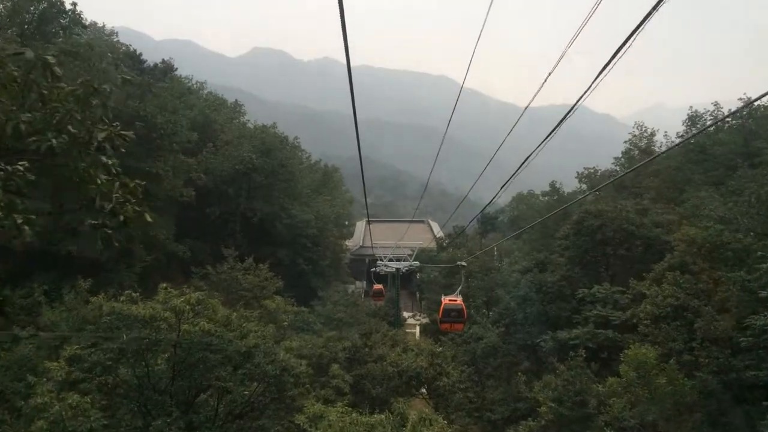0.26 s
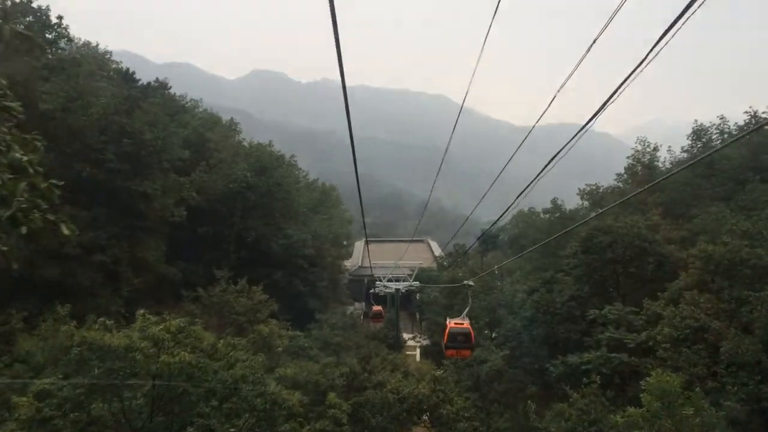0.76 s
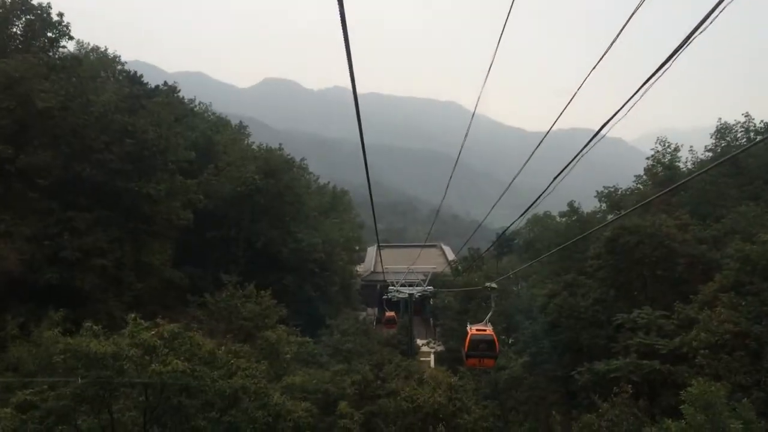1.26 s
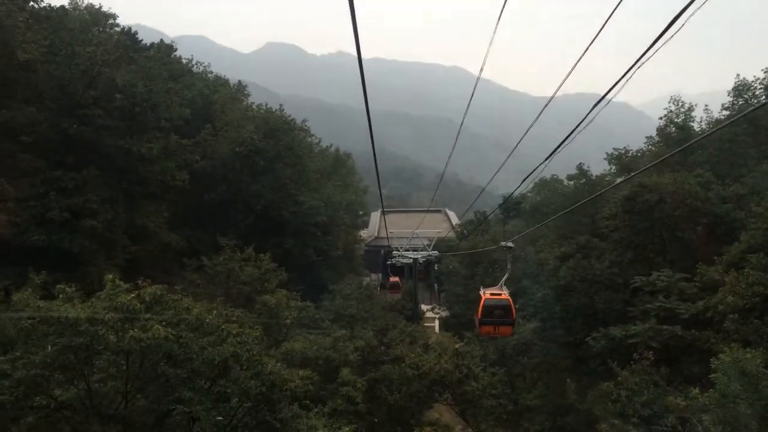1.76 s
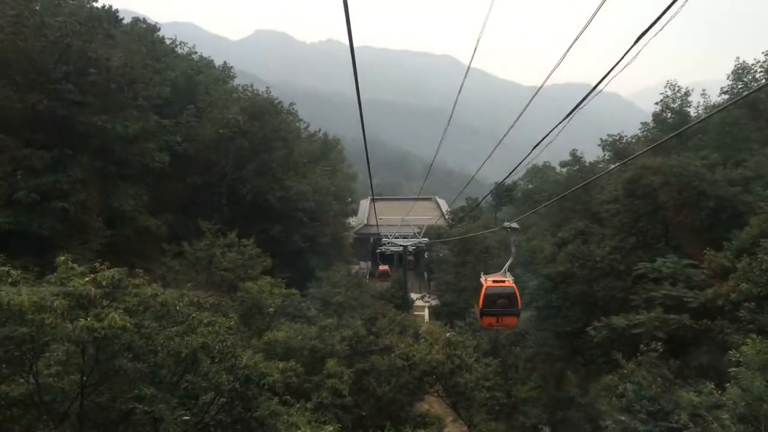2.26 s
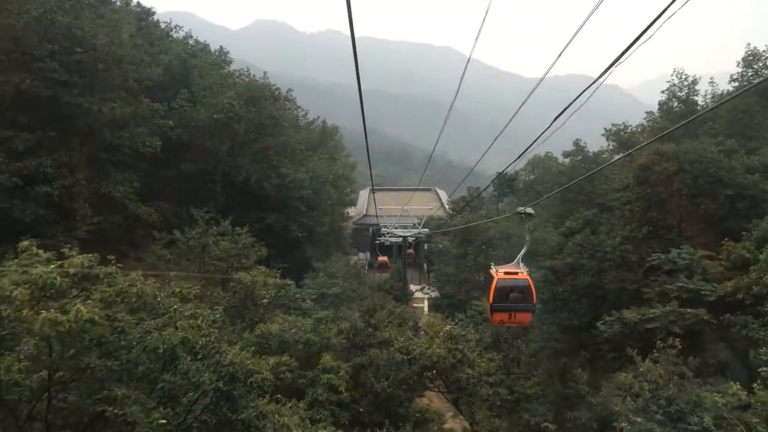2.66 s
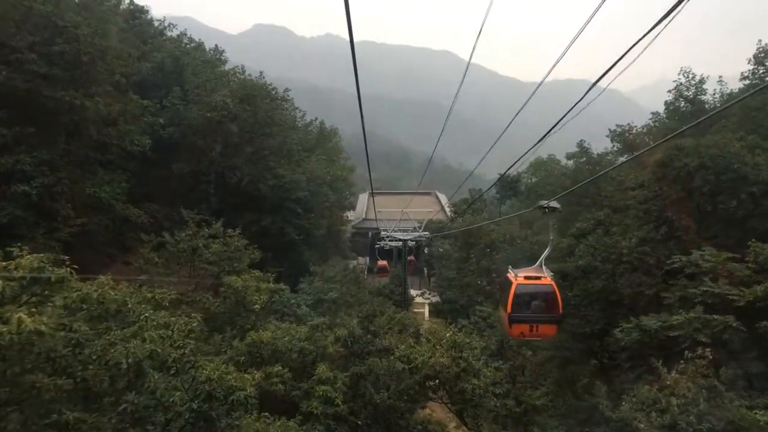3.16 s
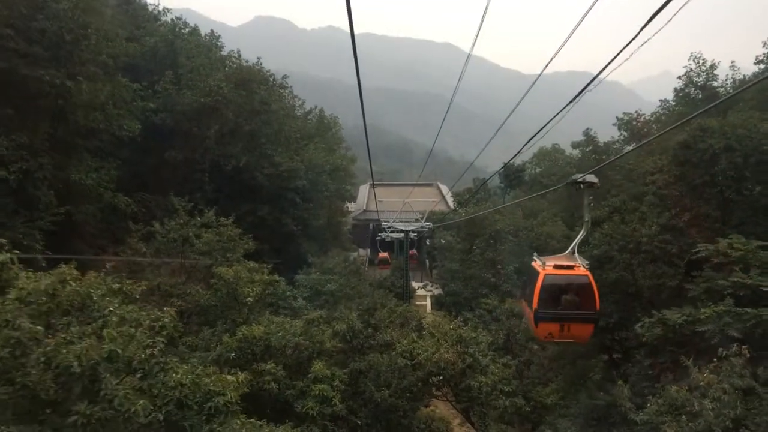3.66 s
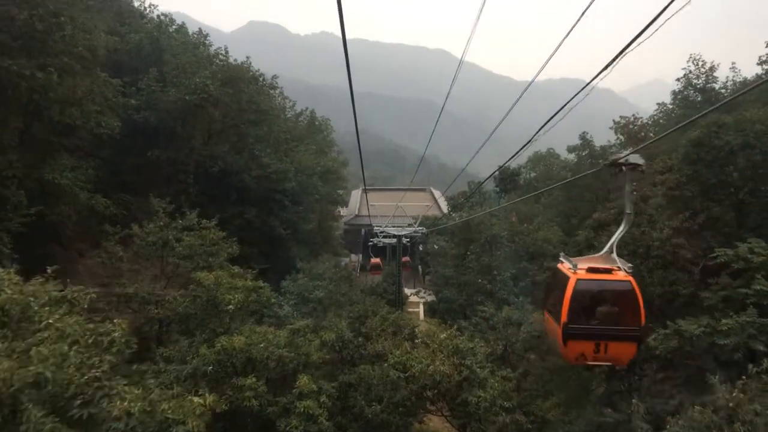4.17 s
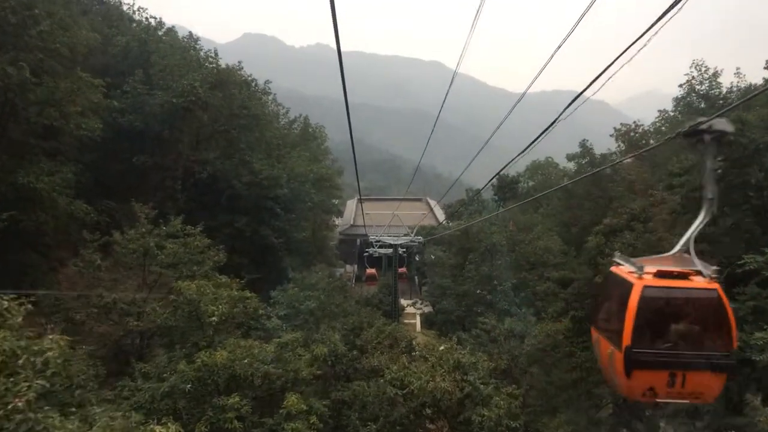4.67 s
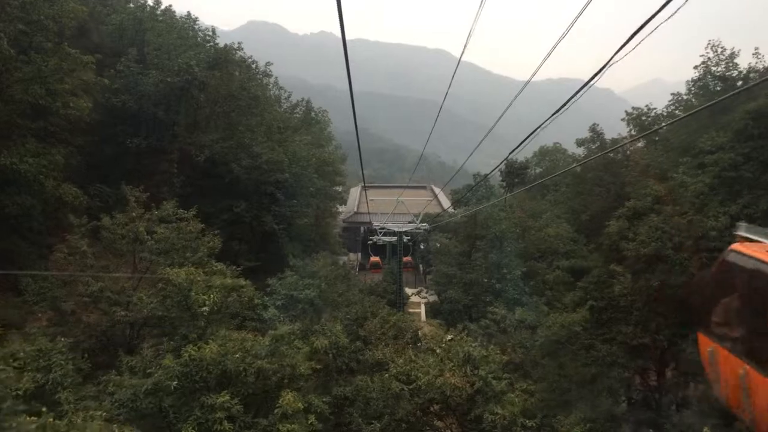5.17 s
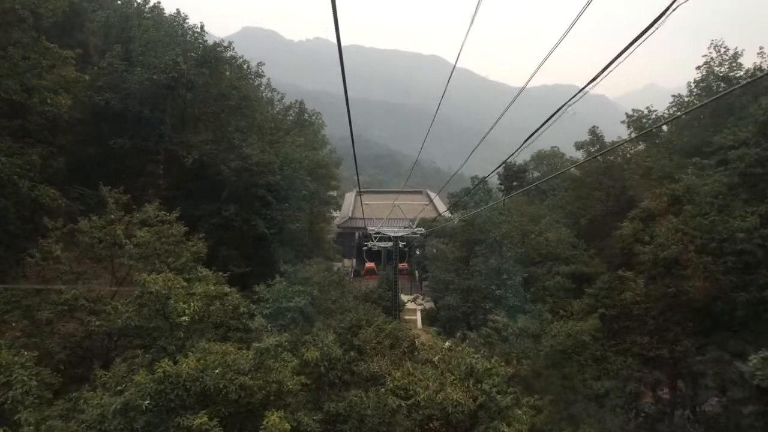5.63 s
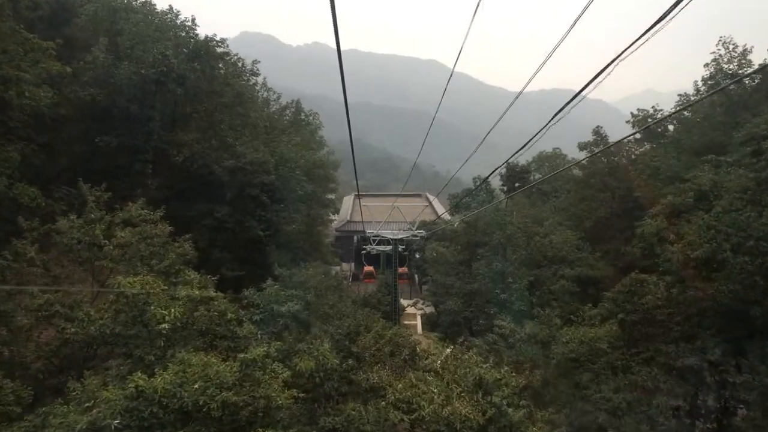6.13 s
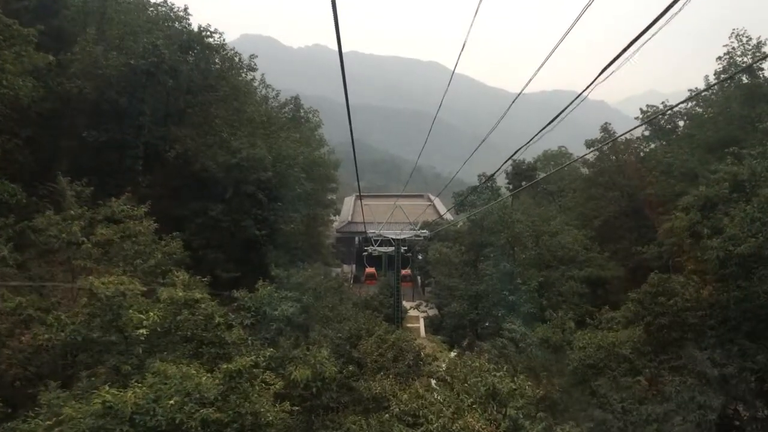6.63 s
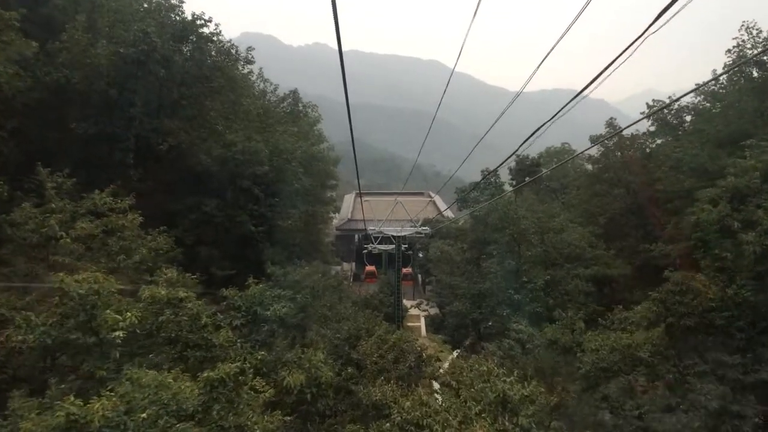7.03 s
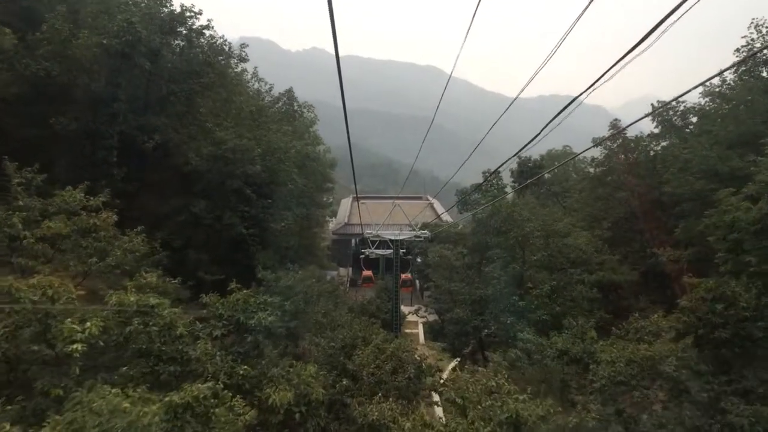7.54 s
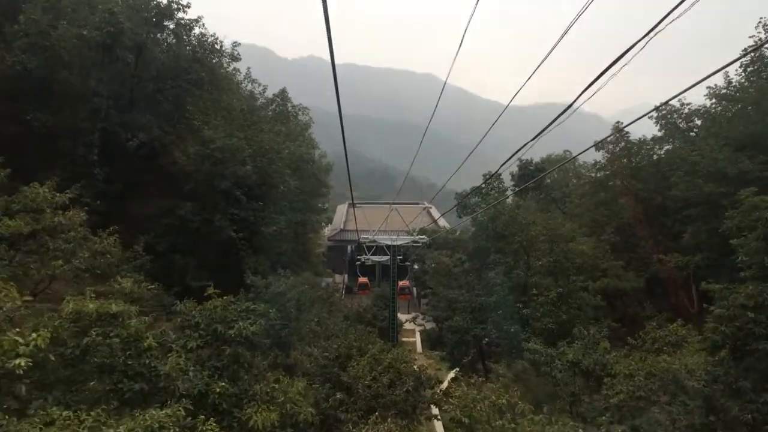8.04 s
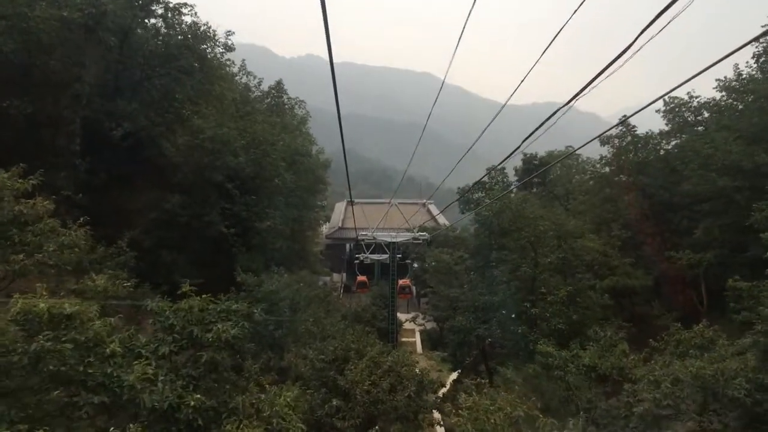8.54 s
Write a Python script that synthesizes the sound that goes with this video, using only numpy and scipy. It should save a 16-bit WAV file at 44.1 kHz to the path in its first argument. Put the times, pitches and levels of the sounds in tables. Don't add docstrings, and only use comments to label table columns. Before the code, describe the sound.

Inside a small gondola cabin, a deep hum and faint airy wash run throughout. Within the first second the grip bumps over tower wheels: heavy jolts, booming panels, dense rattling and a short gritty grind. Afterwards a loose hanger part knocks irregularly on the same metal frame, firm at first, then softer and duller, with faint rubbing. Close, slightly hissy microphone in the cabin.

```python
import sys
import numpy as np
from scipy import signal
from scipy.fft import rfft, irfft, next_fast_len
from scipy.io import wavfile
from scipy.ndimage import uniform_filter1d

SR = 44100
rng = np.random.default_rng(int(sys.argv[2]) if len(sys.argv) > 2 else 0)


def boost_factor(decibels):
    exponent = np.asarray(decibels, float) / 20
    return 10 ** exponent


def put_to_file(sound):
    columns = np.atleast_2d(sound).T
    safe = np.clip(columns, -1, 1)
    whole_steps = np.round(safe * 32767)
    wavfile.write(sys.argv[1], SR, whole_steps.astype(np.int16))


N = 388080

# pitch in Hz, level in dB, time to fall by 60 dB in seconds, time of the top in ms.
FRAME_MODES = [(337.4, -43.5, 0.98, 6.4), (455, -30, 0.15, 4.9), (522, -39, 0.41, 1.6),
               (619.4, -43.5, 0.088, 31), (754.8, -35, 0.47, 1.4), (846.3, -35.5, 0.38, 17),
               (988, -59, 0.27, 66), (1171, -45, 0.24, 21), (1389, -41.5, 0.33, 8.7),
               (1518, -33.5, 0.15, 8.9), (1607, -37.5, 0.18, 63), (1654, -38.5, 0.04, 20.5),
               (1797, -39.5, 0.06, 34.5), (1836, -39, 0.53, 13.4), (1926, -39, 0.068, 27),
               (1970, -60, 0.06, 2.6), (1985, -54, 0.39, 16), (2420, -37.5, 0.28, 1.3),
               (2313, -43, 0.033, 9.8), (2444, -48.5, 0.2, 68), (2490, -69, 0.3, 250),
               (2490, -43, 0.16, 23), (2916, -37, 0.032, 1.9), (2550, -79, 0.25, 6.6),
               (2764, -48.5, 0.24, 23.6), (3240, -68, 0.15, 6.9), (3270, -57, 0.27, 3.6),
               (3271, -73, 0.2, 61), (3480, -58.5, 0.24, 25), (4100, -61, 0.047, 12)]
# frequency in Hz, level in dB per Hz.
SMALL_MODE_COLOUR = [(250, -8), (480, -6), (850, 3), (1050, -9), (1600, 0.5), (2900, -8.5), (3150, -17.5),
                     (4500, -24.5), (7000, -53)]


def evened(x):
    return x / np.sqrt(np.mean(x ** 2) + 1e-20)


def curve(rows, column):
    rows = np.array(rows)
    return np.interp(np.arange(N) / SR, rows[:, 0], rows[:, column])


def coloured(x, points):
    hz, db = np.transpose(points)
    size = next_fast_len(len(x) + 4096)
    f = np.fft.rfftfreq(size, 1 / SR)
    gain = boost_factor(np.interp(np.log(f + 1), np.log(hz + 1), db, left=-90))
    return irfft(rfft(x, size) * gain, size)[:len(x)]


def resonate(x, hz, width):
    r = np.exp(-np.pi * width / SR)
    return 2 * signal.lfilter([1 - r], [1, -r * np.exp(2j * np.pi * hz / SR)], x).real


def add(mix, s, sound):
    part = mix[max(round(s * SR), 0):][:len(sound)]
    part += sound[:len(part)]


def hum(modes, column, steady_s=0.12):
    # time in seconds, pull of the cable strands in dB, shaking of the hanger in dB.
    ride = [(0.0, -41, -37), (0.19, -21.5, -24), (0.37, -43, -38.5), (0.56, -23, -28), (1.25, -37.5, -25),
            (1.42, -34.5, -38.5), (1.94, -29.5, -37.5), (2.13, -59, -26.5), (2.3, -28.5, -36.5),
            (3.87, -37.5, -41), (6.77, -33.5, -37.5), (7.01, -37, -44), (7.67, -32.5, -39),
            (8.65, -37.5, -38.5), (8.8, -34, -33.5)]
    shake = rng.standard_normal(N)
    x = evened(sum(boost_factor(db) * evened(resonate(resonate(shake, hz, w), hz, 2 * w)) for hz, w, db in modes))
    size = round(steady_s * SR)
    slow = uniform_filter1d(uniform_filter1d(x ** 2, size), size)
    return boost_factor(curve(ride, column) - 2.0) * x / np.sqrt(abs(slow) + 0.031)


def blows():
    # time in seconds, blow in dB, treble tick in dB.
    firm_knocks = [(0.1873, -2, -62), (0.3872, -7, -55.5), (0.4406, -7.5, -58), (1.5668, -13.5, -61),
                   (1.8144, -5, -63.5), (1.9323, -11, -58.5), (2.0024, -3, -62), (2.1016, 2, -49.5),
                   (2.1671, 1, -57), (2.376, -14.5, -60.5), (2.6259, -12, -59), (2.6877, -5, -63.5),
                   (2.884, -12, -59), (3.089, -7, -67), (3.3714, -18, -62.5), (3.4348, -8, -56.5),
                   (3.5892, -11.5, -60.5), (3.68, -8.5, -59), (4.15, -19, -61.5), (4.2286, -9, -59.5),
                   (4.3219, -12, -60), (4.52, -5, -55), (4.7336, -13, -61.5), (4.872, -4.5, -57.5),
                   (4.9428, -4, -52), (4.9991, -4, -62), (5.486, -16, -62.5), (5.9006, -18, -61.5),
                   (6.031, -10, -57), (6.1301, -10, -61)]
    # time in seconds, blow in dB, treble tick in dB.
    shaken_blows = [(0.5164, -32, -72), (0.576, 6.5, -33), (0.621, 5.5, -58.5), (0.663, -5, -87.5),
                    (0.685, 1, -40.5), (0.743, 7.5, -53.5), (0.7655, 5, -50.5), (0.782, -1, -56),
                    (0.797, 5.5, -57), (0.813, -20, -62.5), (0.8812, 1.5, -38), (0.9489, 6.5, -56),
                    (0.979, 4.5, -54.5), (0.9996, -3.5, -43.5), (1.012, 0, -63), (1.079, -5, -63.5),
                    (1.123, 4.5, -61), (1.1511, 11, -52), (1.196, -10, -74), (0.663, -4, -71),
                    (0.904, 2.5, -56), (1.024, -5, -66), (1.17, 3.5, -62), (1.199, -20, -86)]
    # time in seconds, blow in dB.
    light_taps = [(0.0955, -22), (0.2667, -15), (1.3115, -14), (1.3946, -15.5), (2.7126, -34),
                  (3.1522, -16), (3.2634, -15), (4.2864, -19), (4.8108, -28), (5.1601, -16.5),
                  (5.3738, -10.5), (5.7505, -11.5), (5.8422, -15), (6.0838, -9), (6.5922, -23),
                  (6.6718, -16), (7.087, -23.5), (7.3093, -13), (7.42, -11.5), (7.5109, -18.5),
                  (8.3462, -17.5), (8.632, -12.5)]
    # time in seconds, blow in dB.
    padded_bumps = [(1.478, -22.5), (1.8544, -20), (2.0513, -9), (3.0399, -11.5), (3.319, -14),
                    (3.864, -19), (3.9287, -18), (4.1032, -16), (4.5811, -11), (5.0878, -21), (5.2311, -21),
                    (5.406, -16.5), (5.605, -9.5), (5.8028, -23), (5.9463, -16.5), (6.2013, -21),
                    (6.308, -14), (6.5092, -17.5), (6.7427, -19), (6.802, -22), (7.0512, -20.5),
                    (7.1368, -13), (7.6017, -25), (7.701, -13.5), (7.804, -17), (8.069, -18),
                    (8.2444, -15.5), (8.187, -38), (8.358, -7.5), (8.4527, -17)]
    full_hard_tick_db, hard_per_db = -57, 1.2
    firm = [(s, db, tick, hard_per_db * (tick - db - full_hard_tick_db))
            for s, db, tick in firm_knocks + shaken_blows]
    taps = [(s, db, -50.5 + 2.5 * db, -1.5) for s, db in light_taps]
    bumps = [(s, db, -91, -13.5) for s, db in padded_bumps]
    return firm + taps + bumps


def stirring(spread_s):
    power = np.zeros(N)
    for s, db, _, _ in blows():
        add(power, s, boost_factor([db]) ** 2)
    size = round(spread_s * SR)
    return abs(uniform_filter1d(uniform_filter1d(power, size), size)) * SR / 10


def rolling():
    # time in seconds, level in dB.
    roughness = [(0.0, -44), (0.19, -63), (0.54, -42), (0.78, -29.5), (1.03, -47), (1.32, -49.5),
                 (1.62, -49), (2.15, -51.5), (2.28, -47.5), (3.82, -48), (3.97, -52), (4.48, -50.5),
                 (5.39, -51), (5.59, -47.5), (7.03, -52), (7.3, -46), (8.21, -52.5), (8.8, -49)]
    stirred_db, stir_s = -46, 0.09
    return np.sqrt(boost_factor(curve(roughness, 1) - 1.5) ** 2 + boost_factor(stirred_db) ** 2 * stirring(stir_s))


def sway(db=-44, follow=0.91, rest_db=-52.5):
    x = evened(resonate(resonate(rng.standard_normal(N), 57.3, 23), 36, 46))
    return boost_factor(db) * (rolling() / boost_factor(rest_db)) ** follow * x


def rumble(per_s=900, spread_db=-2.0, panel_db=-5, flicker_db=6.0, lump_db=3.0):
    # frequency in Hz, level in dB per Hz.
    panel_colour = [(100, -8.5), (170, -3), (269, -7.5), (333, -6), (456, -4), (579, -12), (835, -16),
                    (925, -22.5), (1300, -32.5), (1690, -48.5), (2860, -96)]
    # pitch in Hz, width in Hz, level in dB.
    panel_modes = [(220, 4.8, 1), (266, 6.9, -2), (335.5, 13.5, 6), (373, 11.4, 3.5), (446, 6.8, 2),
                   (527.7, 11, -3.5), (610.7, 5.5, -13)]
    # frequency in Hz, level in dB per Hz.
    rub_colour = [(600, -8), (900, 5.5), (1700, 2), (2100, 0.5), (2500, -10), (3500, -11), (5000, -38)]
    rub_db, rub_follow, rub_s = -58, 0.78, 0.084

    grain_size = boost_factor(spread_db * np.minimum(rng.exponential(1, N), 3))
    grains = rng.standard_normal(N) * (0.11 + grain_size * (rng.random(N) < per_s / SR))
    panels = evened(coloured(grains, panel_colour))
    ringing = evened(sum(boost_factor(db) * evened(resonate(resonate(grains, hz, w), hz, 3 * w))
                         for hz, w, db in panel_modes))
    x = panels + boost_factor(panel_db) * ringing

    slips = boost_factor(flicker_db * evened(resonate(rng.standard_normal(N), 0, 15)))
    rubbing = evened(coloured(slips * rng.standard_normal(N), rub_colour + [(8000, -67.5)]))
    swinging = (stirring(rub_s) + 0.00062) ** (rub_follow / 2)

    wander = evened(resonate(resonate(rng.standard_normal(N), 0, 6.4), 0, 24))
    lumps = boost_factor(lump_db * wander)
    return rolling() * lumps * x + boost_factor(rub_db) * swinging * rubbing


def air(swell_db=2.5):
    # frequency in Hz, level in dB per Hz.
    vent_colour = [(700, -9), (1100, 4.5), (1600, 0), (2300, -4.5), (2600, -12.5), (3800, -19), (6000, -30)]
    swell = boost_factor(swell_db * evened(resonate(resonate(rng.standard_normal(N), 0, 2.5), 0, 5)))
    return boost_factor(-73) * swell * evened(coloured(rng.standard_normal(N), vent_colour + [(9000, -71)]))


def scuffs():
    # time in seconds, level in dB, length in seconds, centre in Hz.
    puffs = [(0.0, -52.5, 0.0033, 4960), (0.84, -64, 0.047, 8000), (1.236, -67.5, 0.017, 2630),
             (1.245, -63, 0.0055, 8600), (2.332, -70, 0.022, 3370), (2.333, -75, .015, 8060),
             (2.413, -72, 0.0036, 9900), (3.615, -74, 0.068, 7000), (3.67, -72, .005, 10100),
             (3.965, -70.5, 0.019, 2550), (4.133, -67, 0.032, 8850), (4.17, -72, 0.0086, 9000),
             (4.669, -73, 0.024, 4500), (6.61, -74, 0.057, 2570), (7.11, -69.5, 0.047, 2700)]
    out = np.zeros(N)
    for (s, db, length, hz), noise in zip(puffs, rng.standard_normal((len(puffs), SR // 10))):
        puff = evened(resonate(resonate(noise, hz, 0.6 * hz), hz, 0.6 * hz))[:round(length * SR)]
        add(out, s, boost_factor(db) * puff * signal.windows.tukey(len(puff), .6))
    return out


def first_waves(t, hold_s=0.036, drop_db=-9):
    rise_s, step_s = .005, .007
    return np.clip(t / rise_s, 0, 1) * boost_factor(drop_db * np.clip((t - hold_s) / step_s, 0, 1))


def small_modes(noise, db=-39, t60=0.41, treble_t60=0.21, colour=SMALL_MODE_COLOUR):
    t = np.arange(len(noise)) / SR
    crowd = evened(coloured(noise, colour))
    low = signal.sosfiltfilt(signal.butter(2, 2200, fs=SR, output="sos"), crowd)
    low_ring = low * boost_factor(-60 * t / t60) * first_waves(t)
    high_ring = (crowd - low) * boost_factor(-60 * t / treble_t60) * np.clip(t / 0.0049, 0, 1)
    return boost_factor(db) * (low_ring + high_ring)


def frame(spot, damping=0.47, scatter_db=-5, spot_db=2.5, spot_tune=0.0063):
    t = np.arange(SR // 4) / SR
    out = np.zeros(len(t))
    changes = rng.standard_normal((len(FRAME_MODES), 2))
    for (hz, db, t60, top_ms), turn, (lift, tune) in zip(FRAME_MODES, spot, changes):
        top_s = top_ms / 1000
        swell = np.sin(np.pi / 2 * np.clip(t / top_s, 0, 1)) ** 4
        ring = np.sin(2 * np.pi * (hz * (1 + spot_tune * tune) * t + turn))
        fall_db = 60 * np.maximum(t - top_s, 0) / (damping * t60)
        out += boost_factor(db + spot_db * lift - fall_db) * swell * ring
    scatter = boost_factor(scatter_db * np.clip(t / 0.058, 0, 1))
    return out * first_waves(t) * scatter + small_modes(rng.standard_normal(len(t)))


def spots(count=7):
    turns = rng.random(len(FRAME_MODES))
    return [frame(turns) for _ in range(count)]


def clack(t):
    # pitch in Hz, level in dB, arrival in ms, length in ms.
    packets = [(2720, -36, 6, 2.5), (2930, -38, 7, 3), (2400, -42, 10, 4)]
    return sum(boost_factor(db) * np.exp(-((1000 * t - ms) / length) ** 2 / 2) * np.sin(2 * np.pi * hz * t)
               for hz, db, ms, length in packets)


def knocks(bodies, soft_hz=1900, own_db=0.0, clack_db=-1, tick_gain_db=-3, sizzle_db=6, sizzle_t60=0.094,
           snap=0.62):
    # frequency in Hz, level in dB per Hz.
    fittings = [(1760, -18), (3000, 0), (3280, -5.5), (4640, -15.5), (5040, -13), (5970, -21.5),
                (6570, -20), (8900, -28), (9820, -16.5), (10600, -29.5), (11200, -32), (12400, -20),
                (15300, -36)]
    sharp, soft, ticks, sizzle = np.zeros((4, N))
    t = np.arange(len(bodies[0])) / SR
    rows, bright = blows(), clack(t)
    tick_shape = np.sin(np.pi * np.clip(t / .009, 0, 1))
    sizzle_start = np.clip(t / 0.003, 0, 1) * (0.76 + snap * np.exp(-t / 0.017))
    noises = rng.standard_normal((len(rows), len(t)))
    for (s, db, tick_db, hard_db), body, noise in zip(rows, bodies * len(rows), noises):
        hard = boost_factor(min(hard_db, 0))
        sound = boost_factor(db) * (body + boost_factor(own_db) * small_modes(noise))
        bright_db = db + clack_db + .5 * min(tick_db - db + 56.5, 0)
        add(sharp, s, hard * (sound + boost_factor(bright_db) * bright))
        add(soft, s, (1 - hard) * sound)

        shaken = np.clip((tick_db + 67) / 14, 0, 1)
        faint_db = 12 * np.clip((-72 - tick_db) / 6, 0, 1)
        add(ticks, s, (1 - shaken) * boost_factor(tick_db - faint_db) * tick_shape * noise)
        t60 = sizzle_t60 * (1.15 + 0.017 * max(tick_db + 82.5, 0))
        grains = noise * abs(noise) / 2
        add(sizzle, s, shaken * boost_factor(tick_db - 60 * t / t60) * sizzle_start * grains)
    soft = signal.sosfilt(signal.butter(4, soft_hz, fs=SR, output="sos"), soft)
    ticks = signal.sosfilt(signal.butter(2, 4000, "high", fs=SR, output="sos"), ticks)
    sizzle = coloured(sizzle, fittings) / np.std(coloured(rng.standard_normal(SR), fittings))
    return sharp + soft + boost_factor(tick_gain_db) * ticks + boost_factor(sizzle_db) * sizzle


def jolts(hz=90, width_s=0.0052, loss_db=-4, count=36):
    # time in seconds, peak in dB.
    strong = [(0.57, -6), (0.746, -15), (0.839, -5), (1.058, -9.5), (1.144, -11), (1.306, -13.5),
              (1.34, -15), (1.6, -22), (2.026, -19.5), (2.1, -15.5), (2.227, -18.5), (2.535, -20.5),
              (3.092, -23.5), (3.543, -19.5), (3.793, -22.5), (4.299, -21), (4.639, -21), (5.629, -20),
              (5.978, -20.5), (6.296, -18.5), (6.345, -20.5), (6.736, -20.5), (7.41, -23), (7.747, -19)]
    # time in seconds, peak in dB.
    rebounds = [(0.769, -1), (0.934, -12), (0.97, -11), (1.259, -12), (4.453, -24), (5.076, -22)]
    out = np.zeros(N)
    t = np.arange(-SR // 30, SR // 30) / SR
    small = [(.05 + u * N / SR, -30 + 8.5 * v) for u, v in rng.random((count, 2))]
    rows = [(s, db, 1) for s, db in strong + small] + [(s, db, -1) for s, db in rebounds]
    for (s, db, way), (turn, tune) in zip(rows, rng.random((len(rows), 2))):
        cycles = hz * (1.0 + 0.32 * tune) * t + 0.44 + .2 * turn
        swing = np.exp(-(t / width_s) ** 2 / 2) * np.sin(2 * np.pi * cycles)
        add(out, s + t[0], way * boost_factor(db + loss_db) * swing)
    return out


def boom(beat=0.95, beat_db=-9):
    # start in seconds, length in seconds, level in dB, pitch in Hz.
    panel_booms = [(2.105, 0.215, -36.5, 331), (0.7, 0.067, -14.5, 115), (0.74, .05, -20.5, 127),
                   (0.5, 0.072, -19, 96), (0.89, 0.044, -23, 108), (0.97, 0.074, -16.5, 128),
                   (0.45, 0.044, -23, 112)]
    out = np.zeros(N)
    for s, length, db, hz in panel_booms:
        t = np.arange(0, length, 1 / SR)
        pair = np.sin(2 * np.pi * beat * hz * t) * boost_factor(beat_db) + np.sin(2 * np.pi * hz * t)
        add(out, s, -boost_factor(db) * np.sin(np.pi * (t / length) ** 0.64) * pair)
    return out


def rattle(per_s=150, spread_db=4):
    # time in seconds, level in dB.
    passing = [
        (0.53, -58),
        (0.79, -30),
        (0.86, -49.5),
        (0.992, -45),
        (1.36, -88),
    ]
    # frequency in Hz, level in dB per Hz.
    loose_colour = [(300, 0), (700, 10), (1100, 3.5), (1600, 0.5), (2900, -11.5), (4500, -22.5),
                    (7000, -59)]
    strength = boost_factor(spread_db * np.minimum(rng.exponential(1, N), 4))
    hits = rng.choice([-1., 1.], N) * strength * (rng.random(N) < per_s / SR)
    start, end = passing[0][0], passing[-1][0]
    on = curve([(start - .03, 0), (start, 1), (end, 1), (end + .03, 0)], 1)
    panels = small_modes(rng.standard_normal(SR // 8), t60=0.1, colour=loose_colour)
    return evened(signal.oaconvolve(hits, panels)[:N]) * boost_factor(curve(passing, 1) + 5.0) * on


def grinds(flicker_db=1.0):
    # start in seconds, length in seconds, level in dB.
    scrapes = [
        (0.738, 0.086, -40.5),
        (0.79, .06, -48),
        (1.151, .045, -52),
        (0.67, 0.036, -51.5),
    ]
    # frequency in Hz, level in dB per Hz.
    grit_colour = [(1500, -18), (3000, 1), (6000, -7), (10000, -17.5), (15000, -27)]
    t = np.arange(N) / SR
    on = sum(boost_factor(db) * np.sin(np.pi * np.clip((t - s) / length, 0, 1)) ** 0.93 for s, length, db in scrapes)
    grit = boost_factor(flicker_db * evened(resonate(rng.standard_normal(N), 0, 150))) * rng.standard_normal(N)
    return on * evened(coloured(grit, grit_colour))


def drags(flicker_db=3):
    # start in seconds, length in seconds, level in dB.
    stretches = [(1.6, 0.21, -66.5), (2.71, 0.37, -66), (3.15, 0.11, -75), (3.72, 0.24, -68.5),
                 (4.347, 0.11, -68), (6.383, 0.35, -66.5), (7.148, 0.39, -67), (7.62, 0.46, -72),
                 (2.25, 0.29, -64.5), (8.15, 0.73, -78), (5.202, .2, -72.5)]
    # pitch in Hz, width in Hz, level in dB.
    seat_modes = [(1970, 150, 4), (2180, 200, -1.5)]
    t = np.arange(N) / SR
    on = sum(boost_factor(db) * np.sin(np.pi * np.clip((t - s) / length, 0, 1)) for s, length, db in stretches)
    slips = boost_factor(flicker_db * evened(resonate(rng.standard_normal(N), 0, 11))) * rng.standard_normal(N)
    return on * evened(sum(boost_factor(db) * resonate(resonate(slips, hz, w), hz, 2 * w) for hz, w, db in seat_modes))


def squeaks(flat=.5, flicker_db=2.5, bend=.18):
    # start in seconds, length in seconds, top pitch in Hz, level in dB.
    tones = [
        (1.908, 0.13, 10280, -72),
        (2.02, 0.14, 9620, -81),
        (2.13, .06, 8900, -83),
        (7.315, .12, 8880, -81),
        (2.04, .09, 6700, -84),
    ]
    out = np.zeros(N)
    for s, length, top_hz, db in tones:
        arch = np.sin(np.pi * np.arange(0, length, 1 / SR) / length)
        hz = top_hz * (1 - bend * (1 - arch ** flat))
        add(out, s, boost_factor(db) * arch * np.sin(2 * np.pi * np.cumsum(hz) / SR))
    return out * boost_factor(flicker_db * evened(resonate(rng.standard_normal(N), 0, 60)))


def scene():
    # pitch in Hz, width in Hz, level in dB.
    low_modes = [(63.4, 4.9, 5), (69.5, 28.5, -7.5)]
    # pitch in Hz, width in Hz, level in dB.
    upper_modes = [(128.6, 7, 4), (106.7, 9.6, 0.5), (116, 160, -6), (159.5, 13, -12)]
    ride = hum(low_modes, 1) + hum(upper_modes, 2) + sway() + rumble() + air()
    loose_part = knocks(spots()) + drags()
    tower = jolts() + boom() + rattle() + grinds()
    return (ride + loose_part + tower + scuffs() + squeaks())[None]


def band_limit(x):
    return signal.sosfilt(signal.butter(12, 15480, fs=SR, output="sos"), x)


def record(dry):
    # frequency in Hz, level in dB per Hz.
    hiss_colour = [(500, 9.5), (3500, 0.5), (9000, -3.5), (14000, -6)]
    # start and end of the dip, start and end of recovery in seconds.
    duck_times = (.55, .7, 1.45, 1.65)
    duck_db = -2 * np.interp(np.arange(N) / SR, duck_times, [0, 1, 1, 0])
    hiss = boost_factor(-75 + duck_db) * evened(coloured(rng.standard_normal(N), hiss_colour))
    fade = np.clip(np.arange(N, 0, -1) / 300, 0, 1)
    limit = .9
    mix = (limit * np.tanh(dry / limit) + hiss) * fade
    edge = signal.firwin(255, 15350, window=("kaiser", 8), fs=SR)
    return band_limit(signal.oaconvolve(mix, edge[None], "same"))


dry = scene()
out = record(dry)
put_to_file(out)
```